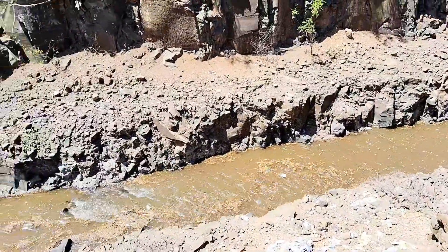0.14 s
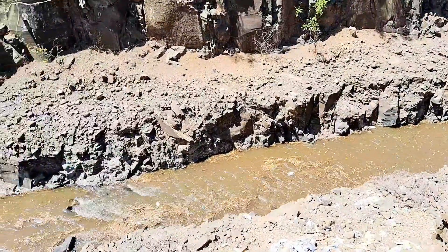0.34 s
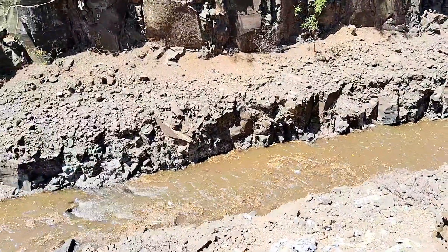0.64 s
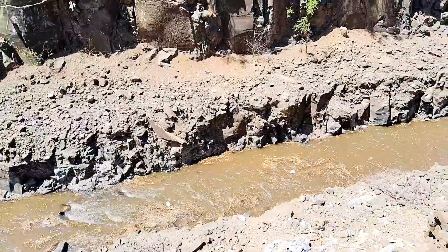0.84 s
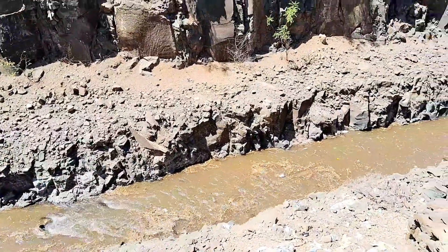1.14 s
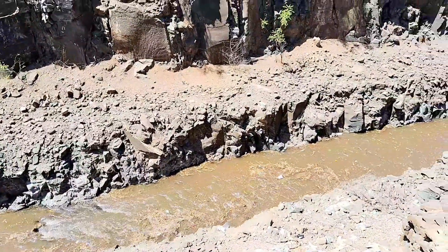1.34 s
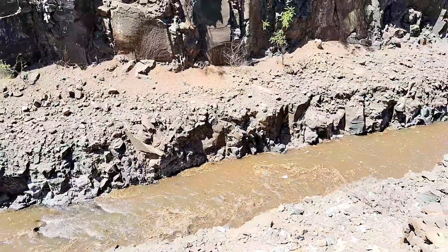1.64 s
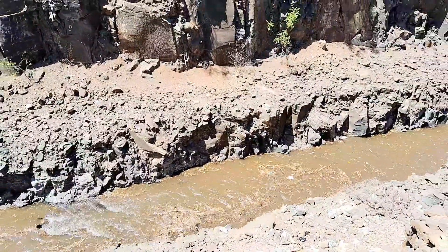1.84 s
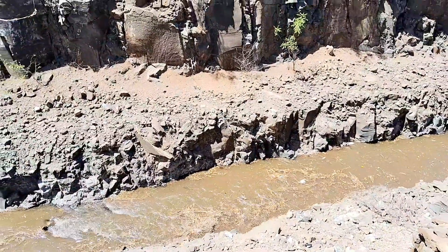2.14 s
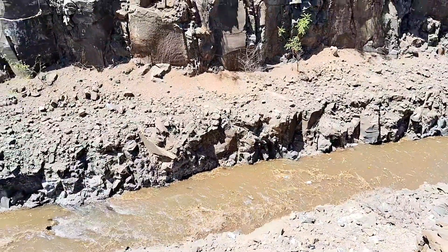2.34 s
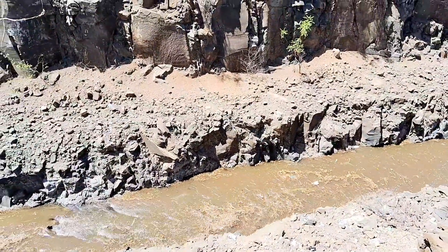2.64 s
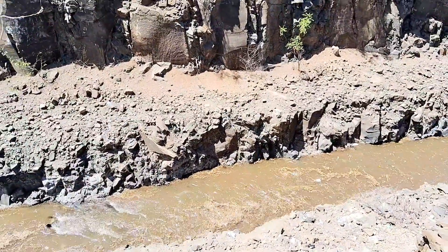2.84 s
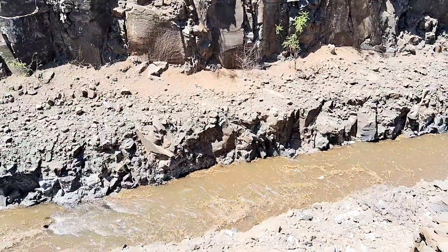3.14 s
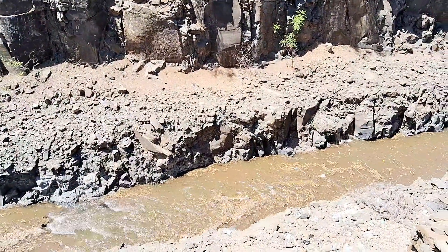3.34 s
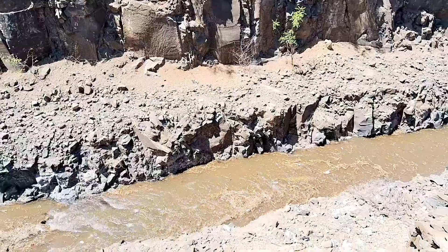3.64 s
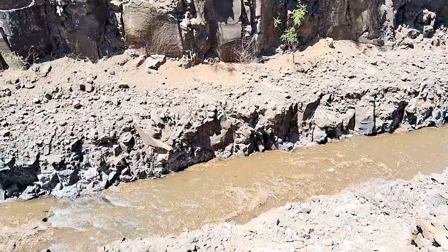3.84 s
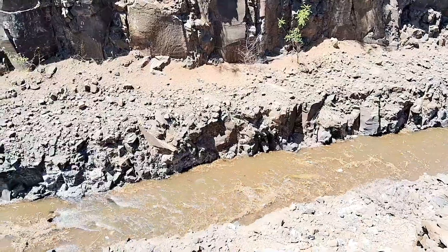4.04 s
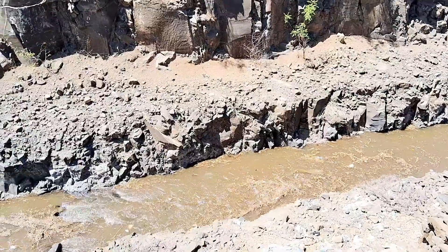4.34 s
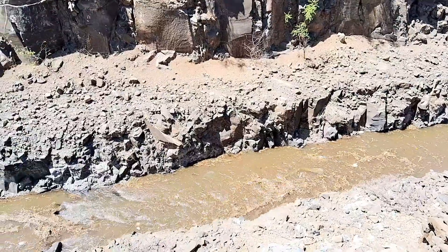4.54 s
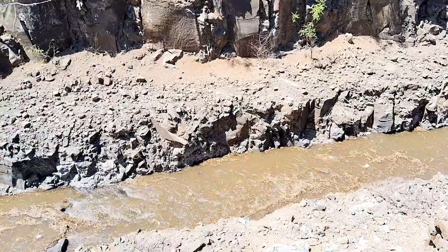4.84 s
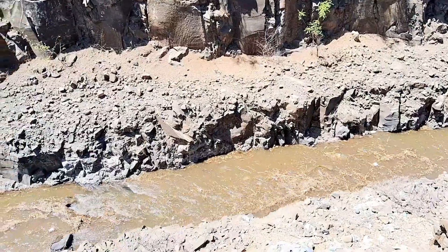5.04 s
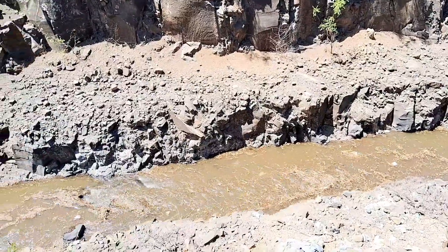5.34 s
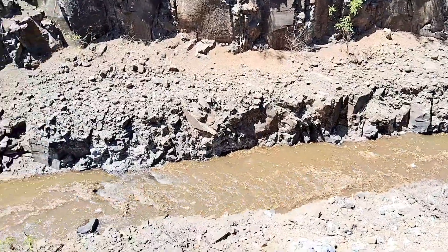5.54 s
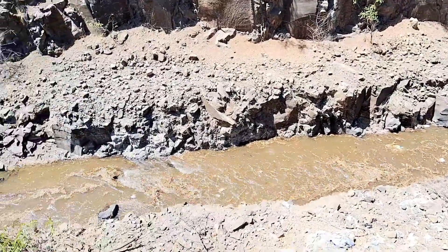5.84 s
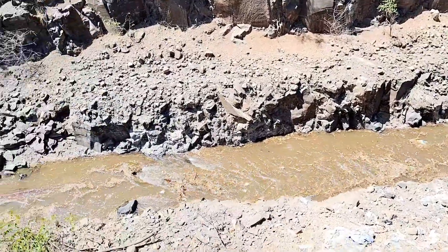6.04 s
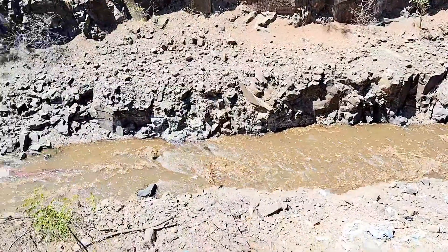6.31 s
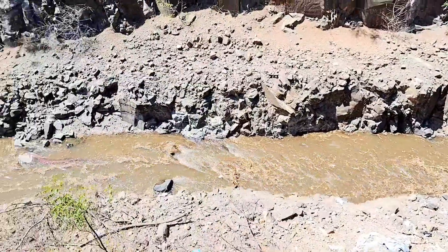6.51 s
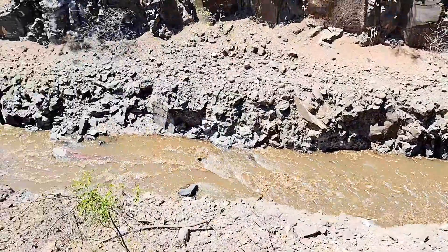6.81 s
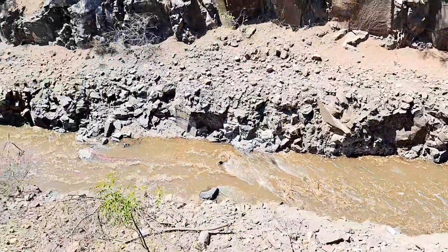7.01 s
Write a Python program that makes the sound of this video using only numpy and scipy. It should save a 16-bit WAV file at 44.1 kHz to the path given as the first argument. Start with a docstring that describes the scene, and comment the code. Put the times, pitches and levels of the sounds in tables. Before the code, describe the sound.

Muddy stream rushes and gurgles steadily over rocks, bubbling and splashing, with low handling tremor, one sharp knock midway and juddering finger rubs near the end.

```python
"""Muddy water rushes and gurgles down a rock-cut canal: banded noise, ringing bubbles, slaps and drops.
It is heard from the bank on a hand-held device, left microphone open, right one under a finger.
The finger muffles the water, trembles, knocks on the case and slides in juddering rubs as the hand turns.
Grit ticks in bright noise bursts; a pebble clacks as a short decaying sine.
A limiter ducks both sides on peaks, holds about a second and recovers slowly."""
import sys
import numpy as np
from scipy import signal
from scipy.fft import rfft, irfft, next_fast_len
from scipy.io import wavfile
from scipy.ndimage import uniform_filter1d, minimum_filter1d

SR = 44100
rng = np.random.default_rng(int(sys.argv[2]) if len(sys.argv) > 2 else 0)


def dump(signal):
    """Clip the signal to [-1, 1] and save it as 16-bit WAV at the path in sys.argv[1]."""
    limited = np.clip(np.atleast_2d(signal).T, -1, 1)
    pcm = np.round(limited * 32767).astype(np.int16)
    wavfile.write(sys.argv[1], SR, pcm)


N = 316194
TIME = np.arange(N) / SR

# steady flow of the water: time_s, level_db
FLOW = [(0, -3.5), (0.35, -2), (1.47, -3), (1.58, 0), (3.6, 1.2), (4.7, 0.26), (5.9, 0), (7.16, 1)]
# waves breaking over the rocks: crest_s, level_db, centre_hz
SURGES = [(0.14, 4, 650), (0.33, -0.7, 1600), (0.73, 2, 750), (1.02, 5.5, 362), (1.33, 7, 333),
          (1.66, 2.5, 750), (1.88, 2.5, 5000), (2.52, 4.5, 474), (2.56, 1.9, 2200), (2.74, 4.5, 348),
          (2.96, 0.8, 1800), (3.6, 3, 600), (3.61, 1, 3000), (4.08, 1, 2500), (4.401, 4, 900),
          (4.6, 4.5, 310), (5.22, 0.5, 740), (5.88, 3, 1800), (6.15, 6.5, 320), (6.19, 3, 4500),
          (6.7, 3, 496), (6.72, 3.5, 2010)]
SURGE_S, SURGE_OCTAVES = 0.063, 0.55  # Gaussian spreads
SPRAY_FOLLOWS = 0.72  # share of the flow's dB swing in the fine spray
# relative water spectrum, open microphone: freq_hz, density_db_per_hz
OPEN_WATER = [(60, -100), (130, -80), (200, -93.5), (280, -87.5), (370, -86), (480, -91.5), (680, -81),
              (900, -84.5), (1400, -85), (2400, -90.5), (3500, -93.5), (5500, -97), (8500, -103),
              (12500, -102.5), (15500, -108)]
# relative water spectrum, covered microphone: freq_hz, density_db_per_hz
COVERED_WATER = [(60, -101), (200, -91), (300, -86.5), (480, -85.5), (680, -80), (880, -77), (1200, -85.5),
                 (1700, -80.5), (2450, -83), (3000, -93), (3500, -100.8), (4300, -111), (5400, -113),
                 (7000, -125)]
# likeness of the water on the two sides: freq_hz, correlation
LIKENESS = [(150, 0.13), (350, 0.84), (700, 1), (1300, 0.35), (2500, 0.67), (4000, 0.23), (7000, 0.094)]
# path difference as the hand turns: time_s, right_lag_ms
TURN = [(0, 0.38), (4, 0.43), (5.7, 0.36), (6.3, 0.3), (7.16, 0.23)]
# large bubbles: start_s, level_db (before swell and decay), pitch_hz, t60_s
PLOPS = [(.078, -38, 710, 0.062), (.471, -41.5, 728, 0.054), (.692, -36.5, 696, 0.056),
         (.729, -42, 753, 0.083), (.855, -43, 680, 0.071), (1.238, -37.5, 870, 0.05),
         (1.595, -37, 715, 0.061), (1.756, -38.5, 791, 0.083), (1.819, -42, 830, 0.049),
         (2.369, -34.5, 610, 0.047), (2.732, -45, 425, 0.072), (4.573, -45, 309, 0.17),
         (5.132, -40, 690, 0.077), (5.175, -29.5, 790, 0.046), (5.265, -32.5, 893, 0.046),
         (5.848, -43, 652, 0.12), (6.119, -48, 274, 0.075), (6.202, -39.5, 604, 0.082),
         (6.717, -36, 1010, 0.043)]
# water slapping the rocks: start_s, level_db, t60_s, centre_hz
SLAPS = [(.344, -40, 0.061, 1420), (4.093, -35.5, 0.017, 2250), (5.51, -40, 0.028, 2430),
         (6.192, -40, 0.039, 1600), (6.866, -40, 0.044, 1960), (6.995, -39, .025, 1920),
         (7.137, -38, 0.013, 1730)]
# finger pressure on the right port: time_s, tremor_db, resonance_boost_db, upper_edge_db
PRESS = [(0, -97, 0.5, -2), (1.48, -81, -1, 3.5), (1.55, -42, 2, 5), (1.8, -40.5, 3, 3), (2.2, -43.5, 2, 3),
         (4.6, -42.5, 3, 1.7), (6.2, -40.5, 4.5, -1), (6.8, -39.5, 5.5, -4.5), (7.16, -45, 7, -11)]
# relative tremor spectrum through the flesh: freq_hz, density_db_per_hz
FLESH = [(15, -53), (30, -19), (48, -10.5), (68, 0.5), (85, -2), (125, -3.5), (160, -14), (210, -22.5),
         (320, -27), (600, -45), (2000, -100)]
# finger knocks, as pushes on the case: centre_s, push_db, half_length_ms
KNOCKS = [(3.7056, 3.8, .77), (4.831, -25.5, 1.5), (5.573, -25, 1.1)]
# modes of case and trapped air: freq_hz, width_hz, gain_db
CASE = [(134, 45, 9.5), (300, 600, 2.4)]
# stick-slip strokes of the finger: start_s, length_s, fastest_slips_per_s, relative_level_db
RUBS = [(5.039, .21, 230, -32), (5.48, 0.12, 182, -35.5), (5.987, 0.15, 178, -25),
        (6.546, .128, 100, -24.5), (6.645, .165, 212, -21.5), (7.079, 0.096, 156, -27.5)]
# fast slips are small: slips_per_s, level_db
SLIP_SIZE = [(80, -4.5), (115, 1), (150, -4), (220, -15.5)]
SLOWEST_SLIPS_PER_S = 88
RUB_PEAKINESS, RUB_FADE = 2.5, 0.74  # powers of the stroke's arch, for speed and level
# grit crunching close by: start_s, relative_level_db, t60_s, centre_hz
GRIT = [(0.266, -48, 0.039, 6960), (4.0398, -44, 0.0083, 8000), (5.4196, -53, .04, 6000),
        (5.7798, -47, 0.03, 10500), (6.0796, -50, .03, 9000), (6.629, -41, 0.055, 5600),
        (6.6384, -34.5, 0.026, 4570), (6.65, -51, 0.29, 5800), (6.699, -43.5, 0.018, 10500),
        (6.9736, -50, .04, 5000)]
# pebble contacts: start_s, level_db
CLACKS = [(6.1985, -30), (6.203, -22.5)]
PEBBLE_HZ, PEBBLE_T60_S, PEBBLE_COVERED_DB = 1840, 0.0056, -6
CEILING_DB, HOLD_S, RELEASE_DB_PER_S = -1.1, 0.96, 7.5  # limiter
CUTOFF_HZ = 15800


def water():
    """Rush, bubbles, slaps and drops; the stream lies to the left, so the right side hears it late."""
    churn_db, gurgle_db, splash_db, spray_db = (vigour(hz) for hz in (370, 750, 1700, 8000))
    white_water = from_db(-1.0) * rush(surge_db=0.66, patchy_db=1.95, spray_patchy_db=0.57)

    near = bursts(SLAPS, width_hz=700)
    splashes = droplets(per_s=16, low_hz=1100, high_hz=2500, t60_s=0.035, width_hz=450)
    near += from_db(splash_db - 44) * splashes
    spray = droplets(per_s=6.8, low_hz=5000, high_hz=13100, t60_s=0.026, width_hz=10000)
    near += from_db(spray_db - 52) * spray

    for start_s, level_db, pitch_hz, t60_s in PLOPS:
        add(near, start_s, from_db(level_db) * bubble(pitch_hz, t60_s, rise=0.13))
    middle = gurgle(per_s=110, low_hz=610.0, high_hz=936.5, cycles=46, rise=0.079)
    near += from_db(gurgle_db - 62) * middle
    deep = gurgle(per_s=16, low_hz=278.5, high_hz=527, cycles=30, rise=0.097)
    near += from_db(churn_db - 70) * deep
    high = gurgle(per_s=50, low_hz=999, high_hz=2625, cycles=36, rise=0.084)
    near += from_db(splash_db - 66) * high

    covered = from_db(2.0) * muffled(near, edge_hz=3400)
    left, right = white_water + np.array([near, covered])
    lag_ms, = in_time(TURN)
    late = np.interp(TIME - lag_ms / 1000, TIME, right)
    return np.array([left, leak(late, lead_radians=0.86)])


def rush(surge_db, patchy_db, spray_patchy_db):
    """White water in half-octave bands: sound common to both sides, plus each side's scatter from the rocks."""
    _, seal_db, edge_db = in_time(PRESS)
    # neighbouring bands take turns on two independent sources
    sources = [np.array([spatter(per_s=1500, spread_db=3.5, share=0.45) for part in range(3)])
               for draw in range(2)]
    surge = drift(15)
    out = np.zeros((2, N))
    edges_hz = 44 * 2 ** (np.arange(18) / 2)
    for k, (low_hz, high_hz) in enumerate(zip(edges_hz, edges_hz[1:])):
        hz = np.sqrt(low_hz * high_hz)
        band = cut(sources[k % 2], [low_hz, high_hz], "band")
        alike = np.clip(at_hz(LIKENESS, hz), 0, 1)
        # coarse water is patchy, fine spray smoother
        misty = at_hz([(2800, 0), (5000, 0.74)], hz)
        patch_db = (1 - misty) * patchy_db + misty * spray_patchy_db
        level_db = vigour(hz) + surge_db * surge + patch_db * drift(19.4)
        pair = from_db(level_db) * (np.sqrt(alike) * band[0] + np.sqrt(1 - alike) * band[1:])
        # finger pressure reshapes the covered side
        seal_share = at_hz([(330, 0.78), (650, 0.19), (900, 0.16), (1400, 0.98)], hz)
        edge_share = at_hz([(1700, 0.28), (2400, 0.6), (3400, 0.31), (4700, 0)], hz)
        pair[1] *= from_db(seal_share * seal_db + edge_share * edge_db)
        out += pair
    return np.array([coloured(out[0], OPEN_WATER), coloured(out[1], COVERED_WATER)])


def vigour(hz):
    """Water level in dB near one pitch: steady flow plus the surges that reach that pitch."""
    flow_db, = in_time(FLOW)
    level_db = at_hz([(2800, 1), (5000, SPRAY_FOLLOWS)], hz) * flow_db
    coarse_s = TIME[::200]
    swell_db = np.zeros(len(coarse_s))
    for crest_s, db, centre_hz in SURGES:
        pitch_gap = np.log2(hz / centre_hz) / SURGE_OCTAVES
        time_gap = (coarse_s - crest_s) / SURGE_S
        swell_db += db * np.exp(-(pitch_gap ** 2 + time_gap ** 2) / 2)
    return level_db + np.interp(TIME, coarse_s, swell_db)


def spatter(per_s, spread_db, share):
    """Countless tiny bursts merge into noise; single nearer droplets stand out of it."""
    size_db = spread_db * np.minimum(rng.exponential(1, N), 4)
    sizes = from_db(size_db) * rng.choice([-1, 1], N)
    drops = rms_one(sizes * (rng.random(N) < per_s / SR))
    share = np.clip(share, 0, 1)
    return np.sqrt(share) * drops + np.sqrt(1 - share) * rng.standard_normal(N)


def gurgle(per_s, low_hz, high_hz, cycles, rise):
    """Air folded under at the rocks rings as a stream of bubbles; rms 1."""
    out = np.zeros(N)
    for when, pitch, size, life in rng.random((int(per_s * N / SR), 4)):
        hz = low_hz * (high_hz / low_hz) ** pitch
        strength = from_db(4.5 * min(-np.log(1 - size), 2.7))
        t60_s = cycles * (0.5 + life) / hz
        add(out, when * N / SR, strength * bubble(hz, t60_s, rise))
    return rms_one(out)


def bubble(hz, t60_s, rise):
    """A trapped bubble rings and rises in pitch, by the fraction rise over t60, as it nears the surface."""
    age_s = np.arange(int(t60_s * SR) + 2) / SR
    swell = 1 - np.exp(-age_s * hz / 3)
    turns = hz * age_s * (1 + rise * age_s / t60_s / 2)
    return swell * decay(age_s, t60_s) * np.sin(2 * np.pi * turns)


def droplets(per_s, low_hz, high_hz, t60_s, width_hz):
    """Thrown drops fall back at random as noise bursts of -10 to 0 dB."""
    when, pitch, size, life = rng.random((200, 4))[:int(per_s * N / SR)].T
    centre_hz = low_hz * (high_hz / low_hz) ** pitch
    rows = zip(when * N / SR, -10 * np.sqrt(size), t60_s * (0.5 + life), centre_hz)
    return bursts(rows, width_hz)


def bursts(rows, width_hz):
    """Sudden noisy bursts that die away, each around its own centre."""
    out, white = np.zeros(N), rng.standard_normal(N + SR)
    for start_s, level_db, t60_s, hz in rows:
        age_s = np.arange(int(min(t60_s, 0.5) * SR) + 200) / SR
        start = int(max(start_s, 0) * SR)
        fade = decay(age_s, t60_s)
        burst = white[start:start + len(age_s)] * fade
        for stage in range(2):
            burst = resonate(burst, hz, width_hz)
        add(out, start_s, from_db(level_db) * rms_one(burst) * np.sqrt(np.mean(fade ** 2)))
    return out


def muffled(x, edge_hz):
    """The finger lets little treble through."""
    return signal.sosfiltfilt(signal.butter(3, edge_hz, fs=SR, output="sos"), x + 1e-18)


def leak(x, lead_radians):
    """Sound squeezing past the finger arrives shifted in phase."""
    analytic = signal.hilbert(x, next_fast_len(N))[:N]
    return np.real(analytic * np.exp(1j * lead_radians))


def hand():
    """The left side has the faint tremor of the grip; the right has the finger's tremor, knocks and rubs."""
    tremor_db, _, _ = in_time(PRESS)
    shake = rng.standard_normal((3, N))
    grip = from_db(-66) * rms_one(cut(cut(shake[0], [52, 84], "band"), 35, "high"))
    finger = from_db(tremor_db + 1.04 * drift(2.9)) * rms_one(coloured(shake[1], FLESH))

    pushes = np.zeros(N)
    for centre_s, push_db, half_ms in KNOCKS:
        offset = 1000 * (TIME - centre_s) / half_ms
        pushes += from_db(push_db) * np.exp(-np.minimum(offset ** 2 / 2, 40))
    finger += muffled(case(pushes), edge_hz=580)
    finger += sum(rub(*row, jitter=0.025, slip_ms=1.0) for row in RUBS)
    # skin scuffs faintly on the case around each push
    scuff = rms_one(cut(shake[2], [600, 1600], "band"))
    finger += from_db(-29) * uniform_filter1d(pushes, size=400) * scuff
    return np.array([grip, finger])


def case(push):
    """Pushes on the case ring its low modes; the microphone drops the deepest part."""
    modes = sum(from_db(gain_db) * resonate(push, hz, width_hz) for hz, width_hz, gain_db in CASE)
    return cut(modes, 60, "high", order=4)


def rub(start_s, length_s, fastest_per_s, level_db, jitter, slip_ms):
    """Skin grips and lets go: one soft, slightly uneven push per slip, quickest in mid-stroke."""
    arch = np.sin(np.pi * np.clip((TIME - start_s) / length_s, 0, 1))
    per_s = SLOWEST_SLIPS_PER_S + (fastest_per_s - SLOWEST_SLIPS_PER_S) * arch ** RUB_PEAKINESS
    turns = np.cumsum(per_s * (1 + jitter * drift(39))) / SR
    from_slip_ms = 1000 * (turns % 1 - 0.5) / per_s
    judder = case(np.exp(-(from_slip_ms / slip_ms) ** 2 / 2))
    judder /= np.sqrt(uniform_filter1d(judder ** 2, size=900) + 1e-12)  # level it
    size_db = at_hz(SLIP_SIZE, per_s) + 1.3 * drift(52)
    return judder * arch ** RUB_FADE * from_db(level_db + size_db)


def grit():
    """Grains crack in short bright bursts; the covered port passes little of them."""
    crunch = from_db(-3) * bursts(GRIT, width_hz=12000)
    return np.array([crunch, from_db(-12) * cut(crunch, 5500, "low", order=3)])


def pebble():
    """A small stone rings for a few cycles at each contact, mostly into the open port."""
    out, age_s = np.zeros(N), np.arange(SR // 20) / SR
    ring = decay(age_s, PEBBLE_T60_S) * np.sin(2 * np.pi * PEBBLE_HZ * age_s)
    for start_s, level_db in CLACKS:
        add(out, start_s, from_db(level_db) * ring)
    return np.array([out, from_db(PEBBLE_COVERED_DB) * out])


def limiter(x):
    """A peak over the ceiling turns both sides down just ahead of it; the gain waits, then creeps back."""
    peak_db = 20 * np.log10(np.abs(x).max(axis=0) + 1e-9)
    over_db = np.maximum(peak_db - CEILING_DB, 0)
    half = int(HOLD_S * SR / 2)
    held_db = -minimum_filter1d(-over_db, size=2 * half + 1, origin=half, mode="constant")
    release_db = RELEASE_DB_PER_S * TIME
    down_db = np.maximum.accumulate(held_db + release_db) - release_db
    # look ahead, then smooth
    gain_db = uniform_filter1d(minimum_filter1d(-down_db, size=500), size=250)
    return x * from_db(gain_db)


def from_db(db):
    """Decibels to gain."""
    return 10 ** (np.asarray(db) / 20)


def rms_one(x):
    """Scale to unit power."""
    return x / np.sqrt(np.mean(x ** 2) + 1e-20)


def decay(age_s, t60_s):
    """Exponential fade of 60 dB per t60."""
    return np.exp(-np.log(1000) * age_s / t60_s)


def in_time(rows):
    """Each column of a curve at every sample."""
    time_s, *columns = np.transpose(rows)
    return [np.interp(TIME, time_s, column) for column in columns]


def at_hz(points, hz):
    """Read a curve on a log-frequency (or log-rate) axis."""
    points = np.array(points)
    return np.interp(np.log(hz), np.log(points[:, 0]), points[:, 1])


def cut(x, hz, kind, order=2):
    """Butterworth filter."""
    sos = signal.butter(order, np.clip(hz, 10, 0.45 * SR), kind, fs=SR, output="sos")
    return signal.sosfilt(sos, x + 1e-18)


def resonate(x, hz, width_hz):
    """Two-pole resonance with gain about 1 on top."""
    r = np.exp(-np.pi * width_hz / SR)
    zeros = np.array([1, 0, -1]) * (1 - r * r) / 2
    poles = [1, -2 * r * np.cos(2 * np.pi * hz / SR), r * r]
    return signal.lfilter(zeros, poles, x + 1e-18)


def coloured(white, spectrum):
    """Give white sound of unit power a spectrum in dB per Hz."""
    size = next_fast_len(N)
    hz = np.maximum(np.fft.rfftfreq(size, 1 / SR), 1)
    shaped = rfft(white, size) * from_db(at_hz(spectrum, hz))
    return irfft(shaped, size)[:N] * np.sqrt(SR / 2)


def drift(corner_hz):
    """Slow random wander, unit power: two-pole smoothed noise at SR / 40, interpolated."""
    r = np.exp(-2 * np.pi * corner_hz * 40 / SR)
    white = rng.standard_normal(N // 40 + 2002)
    slow = signal.lfilter([1], [1, -2 * r, r * r], white)[2000:]  # skip the filter's start
    return np.interp(np.arange(N) / 40, np.arange(len(slow)), rms_one(slow))


def add(track, start_s, sound):
    """Mix a short sound into a track."""
    start = int(np.clip(round(start_s * SR), 0, N - 1))
    track[start:start + len(sound)] += sound[:N - start]


def scene():
    """Stream, handling and stones."""
    return water() + hand() + grit() + pebble()


def record(dry):
    """The limiter acts, then the top is cut steeply."""
    top_cut = signal.ellip(10, 0.1, 70, CUTOFF_HZ, fs=SR, output="sos")
    return signal.sosfilt(top_cut, limiter(dry))


dry = scene()
out = record(dry)
dump(out)
```